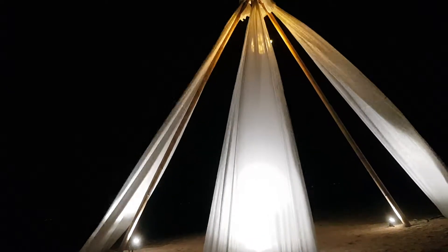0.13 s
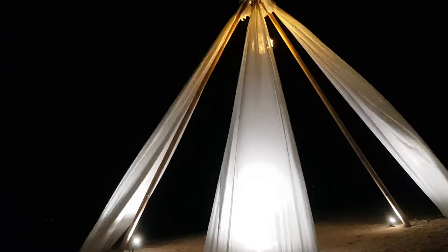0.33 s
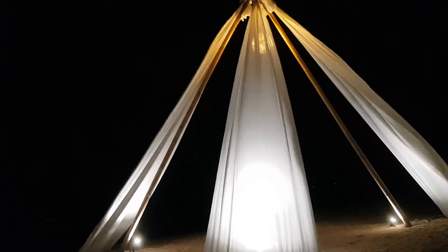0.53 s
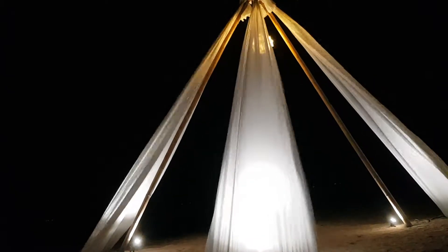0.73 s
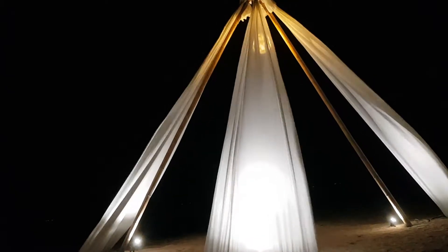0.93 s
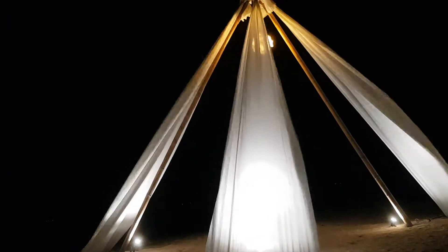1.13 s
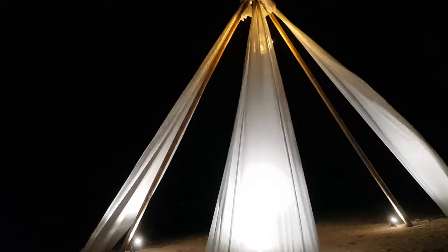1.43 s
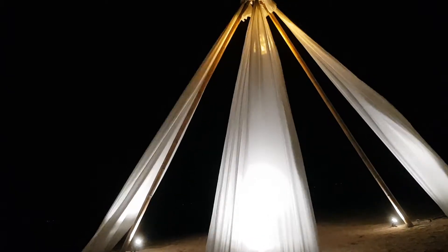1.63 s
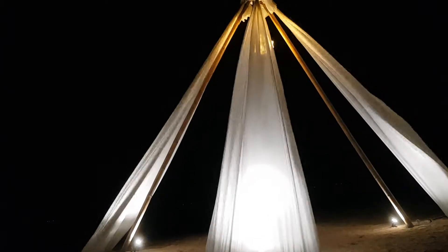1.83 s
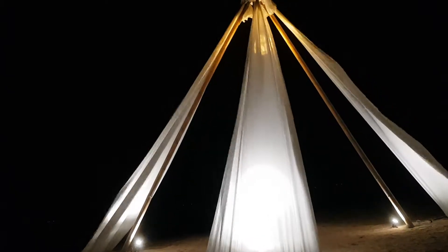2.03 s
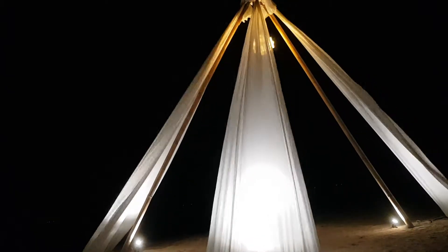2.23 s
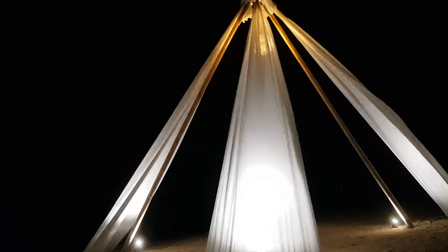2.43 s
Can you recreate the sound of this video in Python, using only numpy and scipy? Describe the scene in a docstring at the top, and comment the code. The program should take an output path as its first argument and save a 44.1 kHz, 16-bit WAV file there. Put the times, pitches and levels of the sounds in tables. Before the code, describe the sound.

Sea surf washes steadily with a fine fizz, easing slowly over about two and a half seconds, with small splashes in the first 1.5 seconds. Wind rumbles and flutters on the microphone throughout, with a few soft thumps from 1.3 seconds on. High crickets rasp in quick runs over distant insects, clearest between 1.1 and 1.6 seconds. The sound dips briefly near one second.

```python
"""A beach at night: surf washes steadily and slowly ebbs, with small splashes and a fizz of tiny bubbles.
Gusts buffet the microphone with a deep rumble, a lighter flutter and a few thumps.
Bush crickets rasp their wings in runs of about twelve chirps a second over a far, even insect chorus.
Near one second the level of all but the fizz dips briefly."""
import sys
import numpy as np
from scipy import signal
from scipy.fft import rfft, irfft, next_fast_len
from scipy.io import wavfile
from scipy.ndimage import uniform_filter1d, map_coordinates

SR = 44100
rng = np.random.default_rng(int(sys.argv[2]) if len(sys.argv) > 2 else 0)


def int16_out(signal):
    """Quantize to a 16-bit WAV file."""
    q = np.round(np.clip(np.atleast_2d(signal).T, -1, 1) * 32767)
    wavfile.write(sys.argv[1], SR, q.astype(np.int16))


N = 113337
TIME_S = np.arange(N) / SR


def amp(db):
    """Decibels to gain."""
    return 10 ** (np.asarray(db) / 20)


def unit(x):
    """Scale to rms 1."""
    return x / np.sqrt(np.mean(x ** 2) + 1e-20)


def along(points, hz):
    """Interpolate (Hz, value) points on a log axis."""
    points_hz, values = np.transpose(points)
    return np.interp(np.log(hz + 1), np.log(points_hz + 1), values)


def curve(points):
    """Interpolate (s, value) points to one value per sample."""
    return np.interp(TIME_S, *np.transpose(points))


def swell(middle_s, sigma_s):
    """Gaussian envelope, peak 1."""
    return np.exp(-((TIME_S - middle_s) / sigma_s) ** 2 / 2)


def wobble(rate_hz):
    """Smooth random curve, rate_hz knots a second."""
    return map_coordinates(rng.standard_normal(N // 20), [TIME_S * rate_hz], mode="mirror")


def pan(db):
    """Left and right gains for a level difference, left over right."""
    return amp(np.array([[1], [-1]]) * db / 2)


def filtered(x, response):
    """Apply a frequency response."""
    size = next_fast_len(N + SR // 2)
    return irfft(rfft(x, size) * response(np.fft.rfftfreq(size, 1 / SR)), size)[..., :N]


def rush(spectrum, correlation, patchy_db):
    """Shaped stereo noise, rms 1, with random gain patches in time and frequency."""
    def mid_side_gains(hz):
        angle = np.arccos(np.clip(along(correlation, hz), -1, 1)) / 2
        return amp(along(spectrum, hz)) * [np.cos(angle), np.sin(angle)]

    bins = signal.stft(rng.standard_normal((2, N)), nperseg=512)[2]
    patches = uniform_filter1d(rng.standard_normal(bins.shape[1:]), size=5, axis=0)
    patches = unit(uniform_filter1d(patches, size=8, axis=1))
    noise = signal.istft(bins * amp(patchy_db * patches), nperseg=512)[1][:, :N]
    mid, side = filtered(noise, mid_side_gains)
    return unit(np.array([mid + side, mid - side]))


def resonance(centre_hz, width_hz):
    """Stereo noise in one resonant band, rms 1."""
    noise = rng.standard_normal((2, N))
    return unit(filtered(noise, lambda hz: 1 / (1 + ((hz - centre_hz) / width_hz) ** 2 / 2) ** 2))


# Ebb of the surf. Each row: time in seconds, level in dB.
SURF_LEVEL = [(0, -42), (.55, -42.5), (.8, -43), (1.15, -44), (1.4, -45), (1.65, -46), (2.15, -46),
              (2.27, -47), (2.4, -46), (2.57, -46)]
# Colour of the surf. Each row: frequency in Hz, relative density in dB.
SURF_SPECTRUM = [(40, -20), (150, -7), (350, -3.5), (600, 1.5), (850, -1.5), (1100, -0.5), (1400, -3.5),
                 (1680, -1.75), (2400, -4.5), (3300, -8), (4400, -8.5), (5400, -14.5), (7000, -14),
                 (9500, -24), (15500, -39)]
# Width of the surf. Each row: frequency in Hz, left-right correlation.
SURF_CORRELATION = [(200, 0.16), (450, 0.28), (750, 0.53), (1300, -0.098), (4000, -0.0029), (12000, -0.04)]


def surf():
    """A wide wash of foam churns in patches and slowly ebbs."""
    foam = rush(SURF_SPECTRUM, SURF_CORRELATION, patchy_db=1.2)
    level_db = curve(SURF_LEVEL) + 0.92 * wobble(rate_hz=28.28)
    return amp(level_db) * foam * pan(db=0.64)


# Colour of the fizz. Each row: frequency in Hz, relative density in dB.
FIZZ_SPECTRUM = [(4000, -29), (6300, -2), (9000, 2), (12200, 0.5), (13500, -1.5), (15700, -6)]


def fizz(below_surf_db=11.5):
    """Tiny bursting bubbles make a hiss that follows the ebb of the surf."""
    hiss = rush(FIZZ_SPECTRUM, SURF_CORRELATION, patchy_db=2.0)
    return amp(curve(SURF_LEVEL) - below_surf_db) * hiss * pan(db=0.5)


# Strength of the deep buffeting and the lighter flutter. Each row: time in seconds, level in dB.
BUFFET_LEVEL = [(0, -34.5), (.23, -38), (.32, -31.5), (.42, -33.5), (.5, -33), (.73, -33), (.78, -38),
                (.85, -32.5), (.91, -34.5), (.97, -42.5), (1.06, -34), (1.15, -43), (1.22, -38.5),
                (1.43, -32.5), (1.6, -38.5), (1.66, -35.5), (1.7, -38), (1.81, -41.5), (1.88, -36),
                (1.99, -39), (2.04, -35.5), (2.09, -34), (2.16, -39.5), (2.42, -41.5), (2.48, -39.5),
                (2.57, -41)]
FLUTTER_DRIVE = [(0, -39), (.33, -38), (.6, -41), (.9, -42.5), (.98, -44), (1.2, -39), (1.32, -40),
                 (1.66, -41), (1.82, -40.5), (1.92, -38.5), (2.08, -43), (2.25, -43.5), (2.31, -40),
                 (2.37, -41), (2.46, -39.5), (2.57, -49)]
# Colour of each. Each row: frequency in Hz, relative density in dB.
BUFFET_SPECTRUM = [(15, -22), (28, -17), (42, -8), (70, 0), (120, -2), (190, -6), (260, -18.5), (400, -22),
                   (900, -58), (2000, -85)]
FLUTTER_SPECTRUM = [(50, -14), (120, 0), (170, -5.5), (230, -0.5), (320, -3.5), (450, -10.5), (700, -26),
                    (2000, -44)]
# The deep rumble drops out of the left channel at times, as wind suppression cuts the bass.
# Each row: time in seconds, left over right in dB.
BASS_BALANCE = [(.92, .5), (.96, -25), (1.06, -1.5), (1.19, -12), (1.27, 0.5), (2.13, 0), (2.25, -25),
                (2.47, -5), (2.53, -25)]


def wind(soft_limit_db=-22.5, left_lead_s=0.00009):
    """Gusts rumble and flutter on the microphone; the strongest swings are softly rounded off."""
    correlation = [(100, 0.89)]  # same at all frequencies
    balance = pan(curve(BASS_BALANCE))
    balance /= np.sqrt(np.mean(balance ** 2, axis=0))  # constant power
    buffet_db = curve(BUFFET_LEVEL) + 0.5 * wobble(rate_hz=34.95)
    buffet = amp(buffet_db) * rush(BUFFET_SPECTRUM, correlation, patchy_db=-1.0)
    flutter_db = curve(FLUTTER_DRIVE) + 1.3 * wobble(rate_hz=24.91)
    flutter = amp(flutter_db) * rush(FLUTTER_SPECTRUM, correlation, patchy_db=0.57)
    pressure = balance * (buffet + eddies()) + flutter
    rounded = pressure / (1 + (pressure / amp(soft_limit_db)) ** 4) ** (1 / 4)
    advance_s = np.array([[1], [-1]]) * left_lead_s / 2
    return filtered(rounded, lambda hz: np.exp(2j * np.pi * hz * advance_s))


# Colour of the far insects. Each row: frequency in Hz, relative density in dB.
CHORUS_SPECTRUM = [(5500, -19), (7200, -6.5), (7850, 0), (8600, -2), (9400, -3.5), (10000, -6),
                   (10800, -8.5), (13000, -33)]
# Strength of the far insects and of one far cricket. Each row: time in seconds, level in dB.
FAR_BAND_LEVEL = [(0, -55), (.55, -53), (.9, -58), (1.45, -55), (1.68, -60), (2, -57), (2.57, -55)]
FAR_TRILL_LEVEL = [(0, -69), (.3, -65), (.9, -65.5), (1.6, -73), (1.85, -73), (2.1, -65), (2.57, -69)]


def chorus():
    """Far insects merge into a shimmering band, with one cricket's thin, wavering trill among them."""
    band_db = curve(FAR_BAND_LEVEL) + 0.7 * wobble(rate_hz=30)
    band = amp(band_db) * rush(CHORUS_SPECTRUM, correlation=[(8000, 0.08)], patchy_db=2.4)
    trill_db = curve(FAR_TRILL_LEVEL) + 2.6 * wobble(rate_hz=24)
    trill = amp(trill_db) * resonance(centre_hz=9560, width_hz=190)
    return (band + trill) * pan(db=1.5)


# Cricket chirps. Each row: middle in seconds, level in dB, pitch in Hz, left over right in dB.
WING_STROKES = [(.005, -53, 10400, -2), (.3, -60, 9200, 1), (.39, -68, 9500, -9), (.47, -59, 9300, 4),
                (.555, -54, 9200, 6), (.63, -56, 9500, -2), (.72, -58, 9300, 4), (.815, -57, 9900, 1),
                (.885, -58, 9400, 2), (1.05, -61, 10100, 5), (1.12, -58, 10000, 1), (1.195, -55, 10100, 1),
                (1.278, -52, 10200, 0), (1.36, -53.5, 10300, -1), (1.445, -55, 10500, 0),
                (1.53, -54.5, 10400, 0), (1.625, -56, 10400, 1), (1.94, -62, 9500, -3),
                (2.04, -57.5, 9400, -4), (2.12, -56, 9350, 0), (2.205, -61, 9300, 4), (2.31, -66, 9300, 5),
                (2.43, -65, 10100, 9), (2.51, -58, 9800, 2)]


def crickets(tooth_hz=331, tooth_depth=0.72, rise_s=0.021, fall_s=0.016):
    """Each wing stroke swells and fades: a rasp of tooth strikes in a broad wing resonance."""
    out = np.zeros((2, N))
    strike_hz = tooth_hz * (1 + 0.082 * wobble(rate_hz=36))
    teeth = 1 + tooth_depth * np.sin(2 * np.pi * np.cumsum(strike_hz) / SR)
    for middle_s, level_db, pitch_hz, pan_db in WING_STROKES:
        stroke = swell(middle_s, np.where(TIME_S < middle_s, rise_s, fall_s))
        rasp = unit(teeth * resonance(pitch_hz, width_hz=450))
        out += amp(level_db) * pan(pan_db) * stroke * rasp
    return out


# Small splashes. Each row: middle in seconds, level in dB, band centre in Hz, swell sigma in seconds.
WAVELETS = [(.09, -45.5, 700, 0.016), (.18, -52, 4270, .03), (.52, -48, 1500, 0.026),
            (.91, -50.5, 1460, 0.03), (1.08, -58, 3580, .035), (1.301, -52, 2250, 0.048)]


def splashes():
    """Wavelets spill: each swells and fades in a broad band of its own."""
    out = np.zeros((2, N))
    for middle_s, level_db, centre_hz, sigma_s in WAVELETS:
        spray = resonance(centre_hz, width_hz=0.39 * centre_hz)
        out += amp(level_db) * swell(middle_s, sigma_s) * spray
    return out


def level_dip(start_s=0.95, end_s=1.007, ramp_s=0.054, floor_db=-5):
    """Gain that dips briefly and recovers."""
    half_s = ramp_s / 2
    return amp(curve([(start_s - half_s, 0), (start_s + half_s, floor_db),
                      (end_s - half_s, floor_db), (end_s + half_s, 0)]))


# Wind thumps. Each row: middle in seconds, level before the soft limit in dB, pitch in Hz.
THUMPS = [(1.318, -28, 180), (1.648, -28, 95), (1.671, -29, 150), (2.033, -28, 75), (2.471, -28, 190)]


def eddies():
    """A strong eddy shakes the microphone diaphragm for a few cycles at most."""
    out = np.zeros(N)
    for middle_s, level_db, pitch_hz in THUMPS:
        cycles = pitch_hz * (TIME_S - middle_s) + rng.random()
        out += amp(level_db) * swell(middle_s, sigma_s=0.0054) * np.sin(2 * np.pi * cycles)
    return out


def scene():
    """Surf, wind and insects; all but the fizz dip briefly in level."""
    return level_dip() * (surf() + splashes() + wind() + crickets() + chorus()) + fizz()


def record(dry):
    """Brick-wall low-pass at 15.8 kHz."""
    return filtered(dry, lambda hz: hz < 15800)


dry = scene()
out = record(dry)
int16_out(out)
```